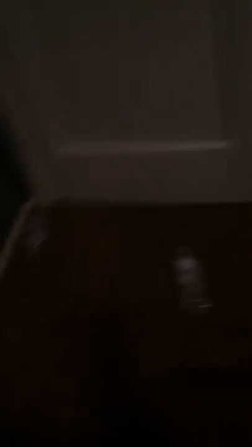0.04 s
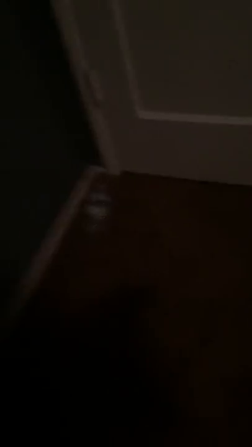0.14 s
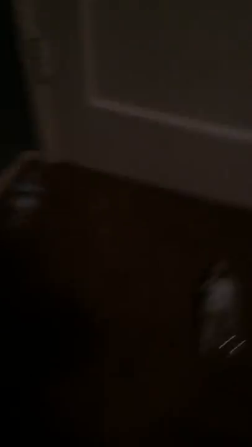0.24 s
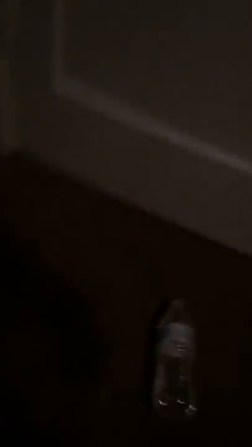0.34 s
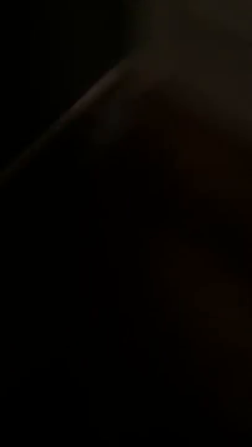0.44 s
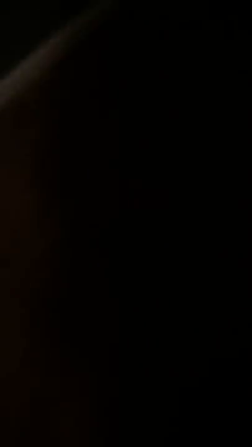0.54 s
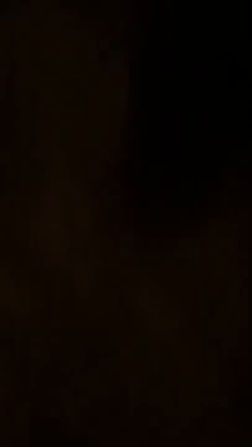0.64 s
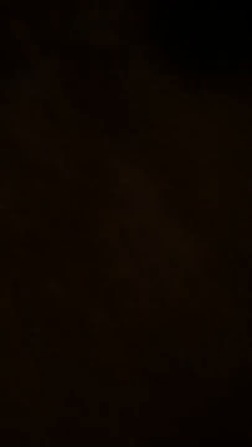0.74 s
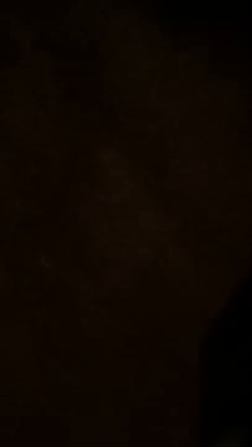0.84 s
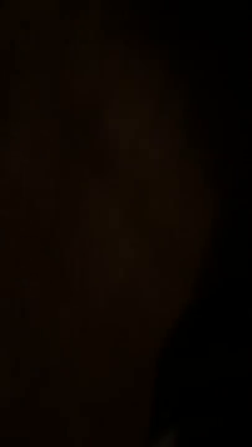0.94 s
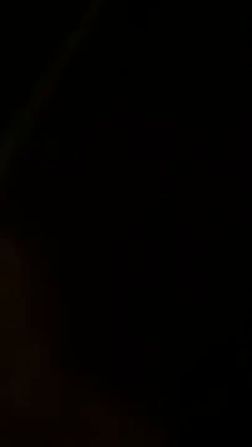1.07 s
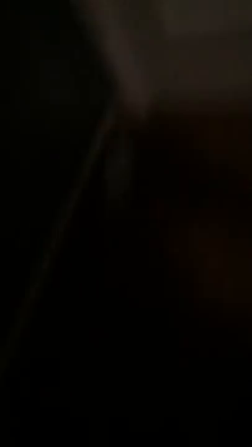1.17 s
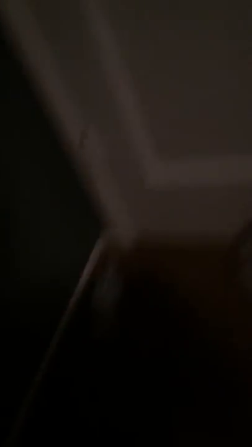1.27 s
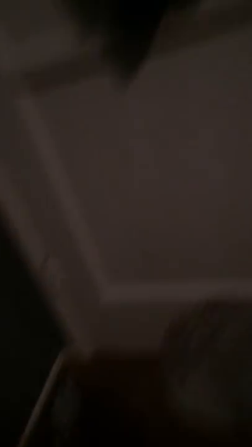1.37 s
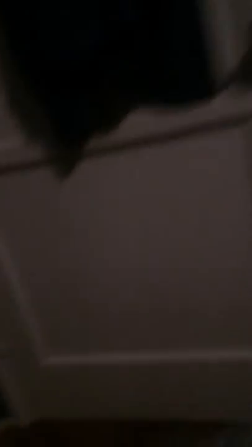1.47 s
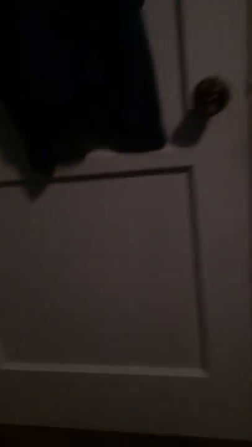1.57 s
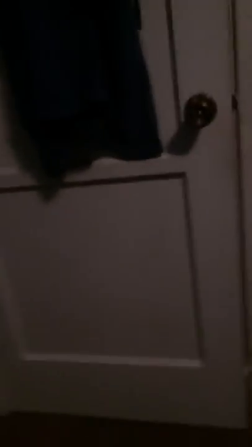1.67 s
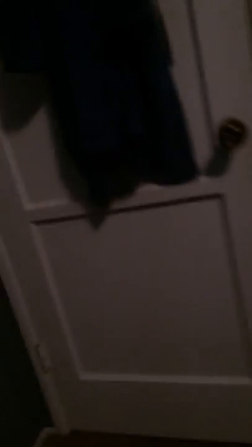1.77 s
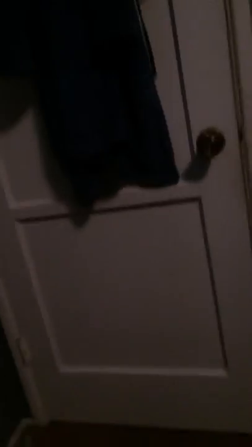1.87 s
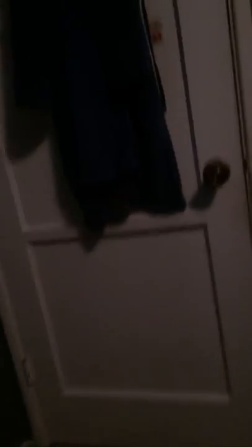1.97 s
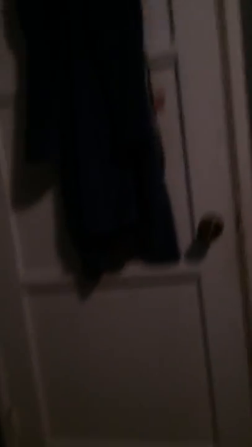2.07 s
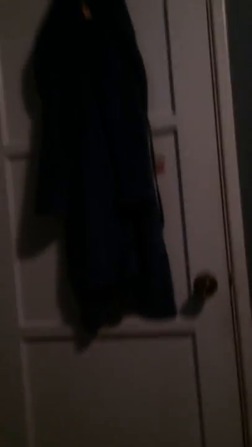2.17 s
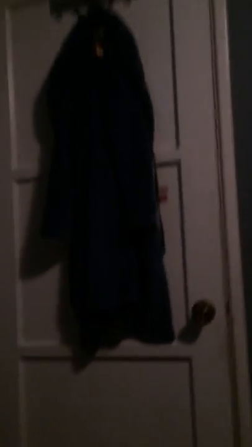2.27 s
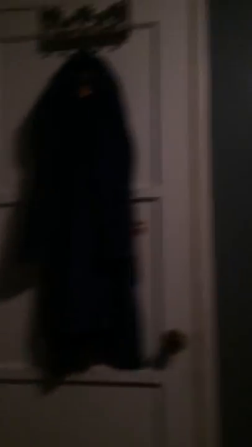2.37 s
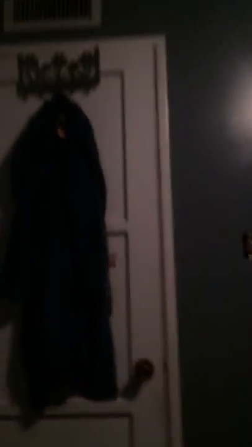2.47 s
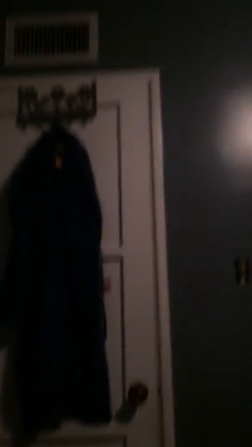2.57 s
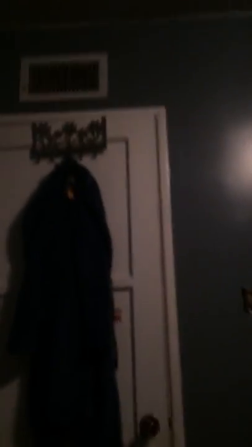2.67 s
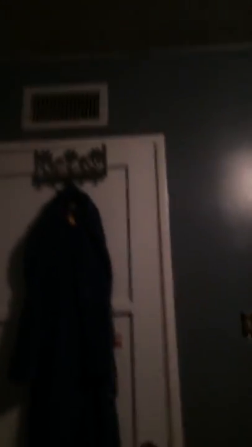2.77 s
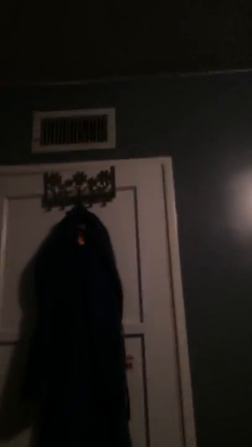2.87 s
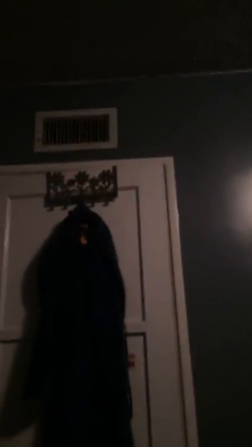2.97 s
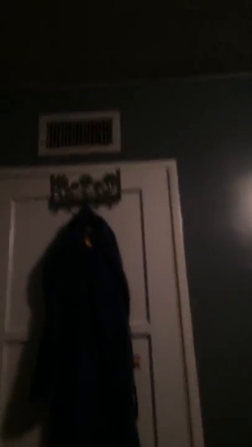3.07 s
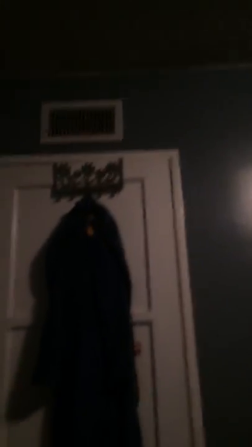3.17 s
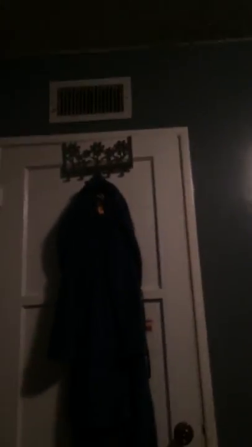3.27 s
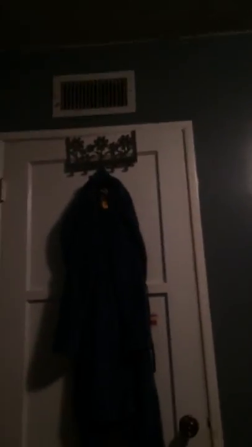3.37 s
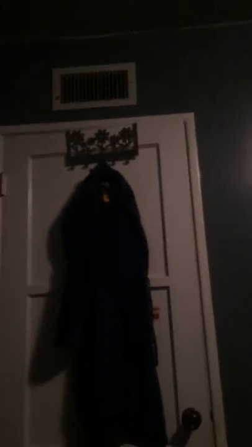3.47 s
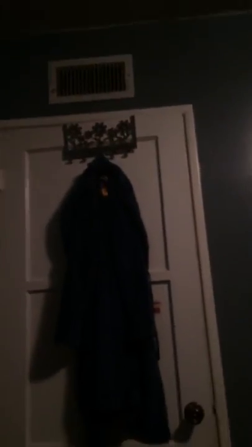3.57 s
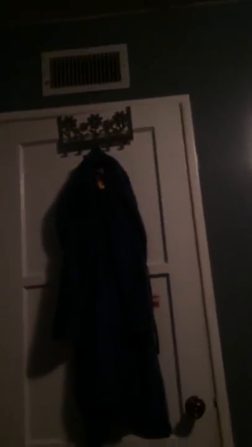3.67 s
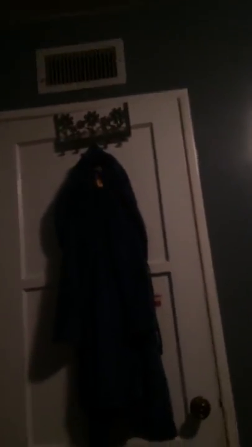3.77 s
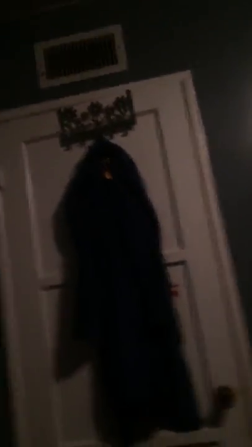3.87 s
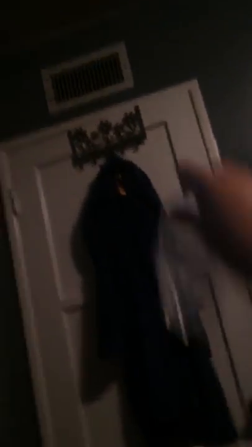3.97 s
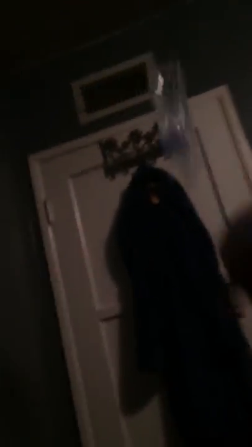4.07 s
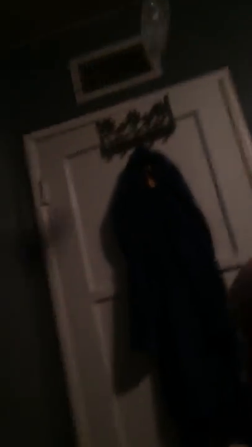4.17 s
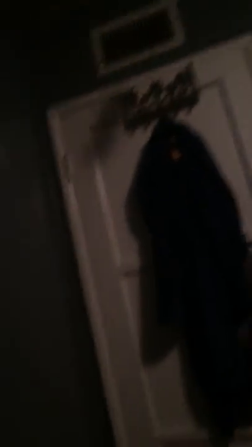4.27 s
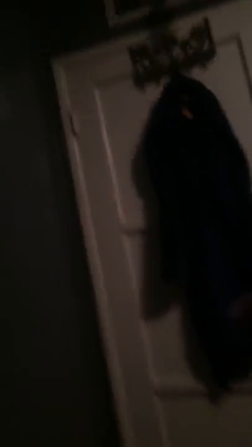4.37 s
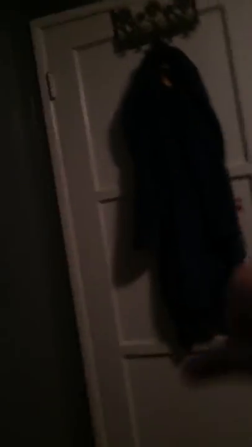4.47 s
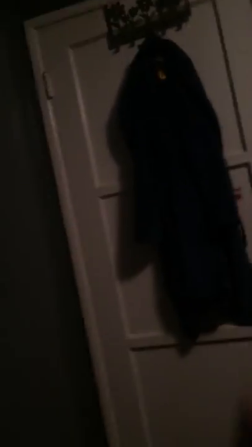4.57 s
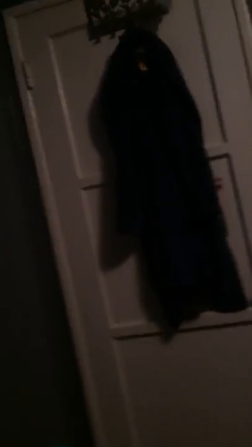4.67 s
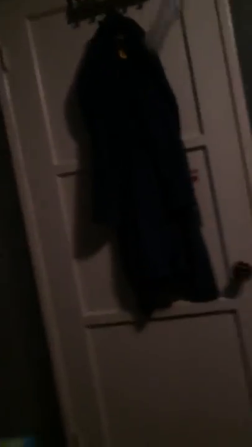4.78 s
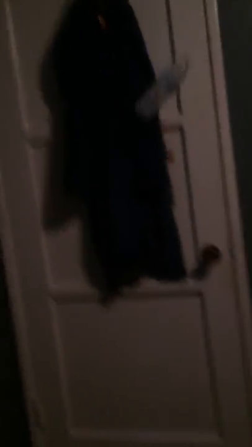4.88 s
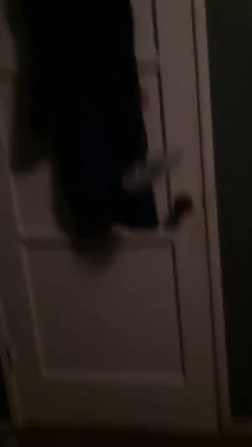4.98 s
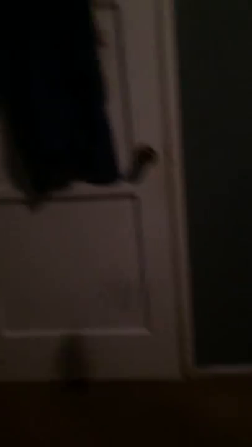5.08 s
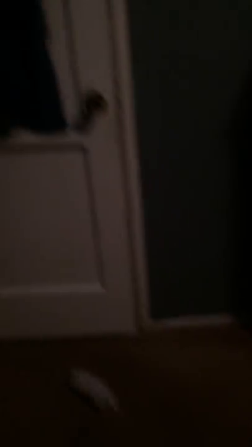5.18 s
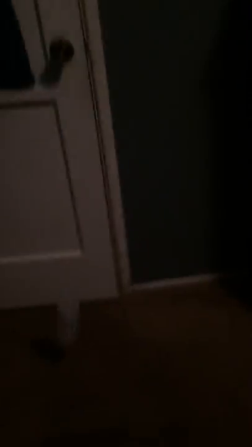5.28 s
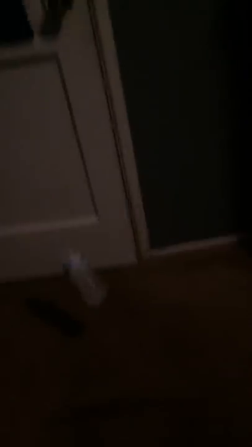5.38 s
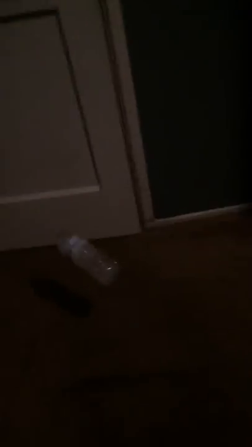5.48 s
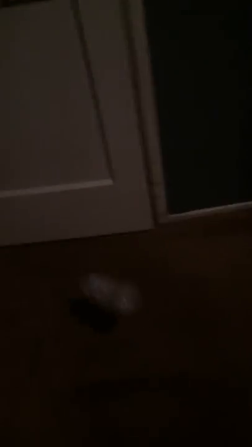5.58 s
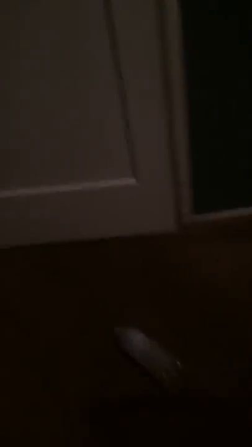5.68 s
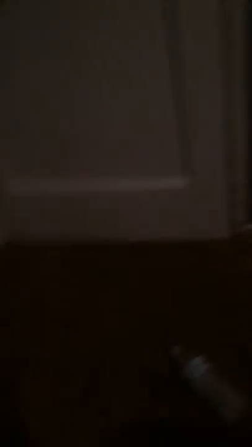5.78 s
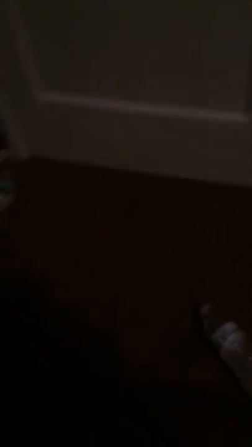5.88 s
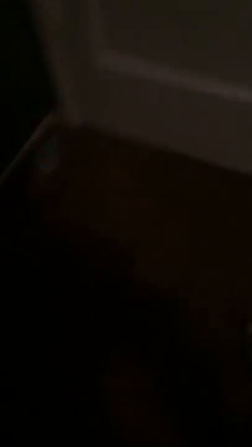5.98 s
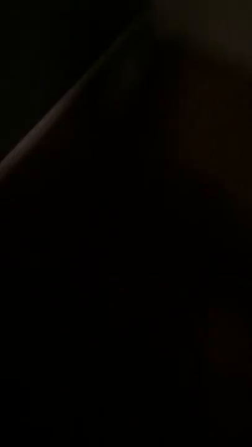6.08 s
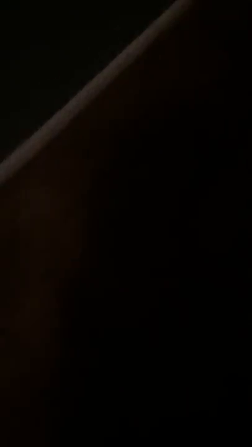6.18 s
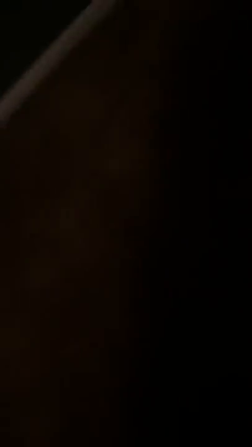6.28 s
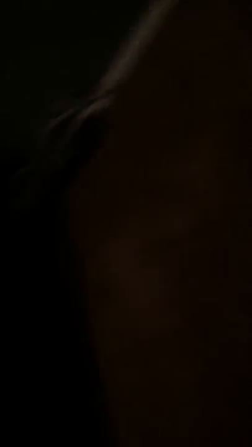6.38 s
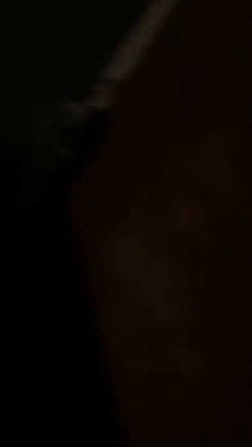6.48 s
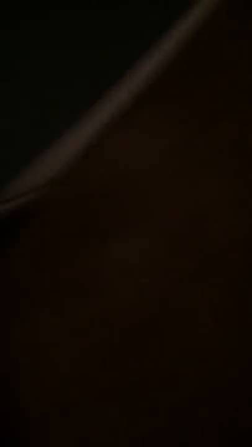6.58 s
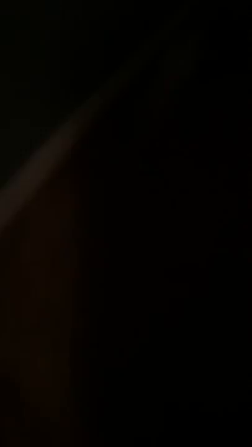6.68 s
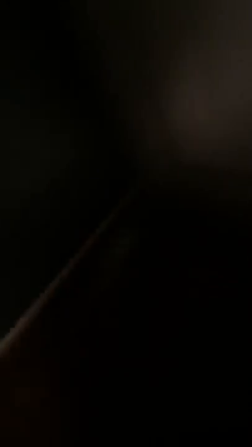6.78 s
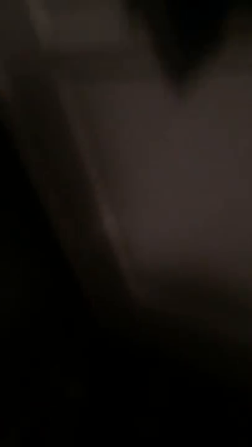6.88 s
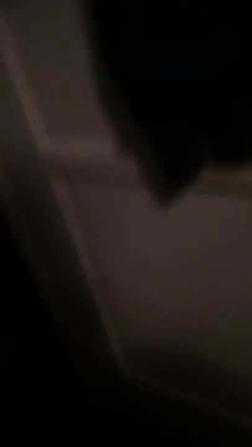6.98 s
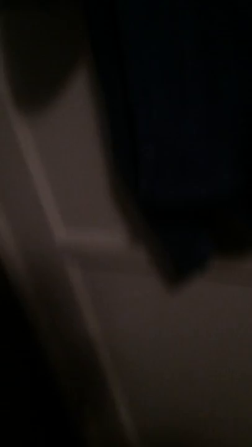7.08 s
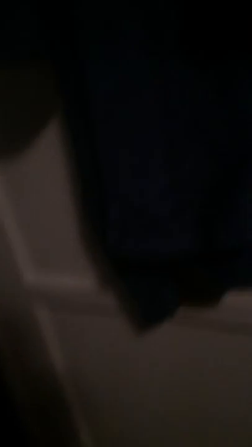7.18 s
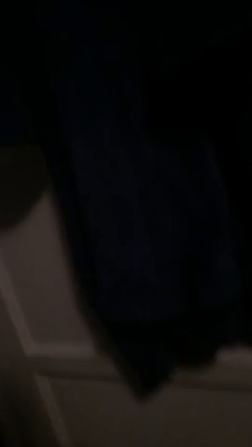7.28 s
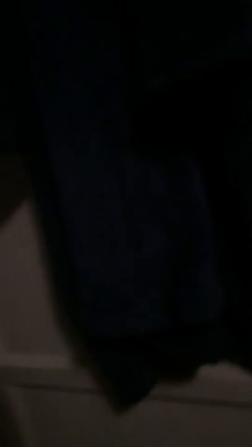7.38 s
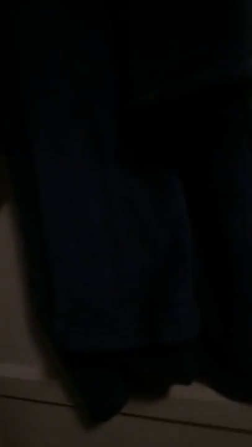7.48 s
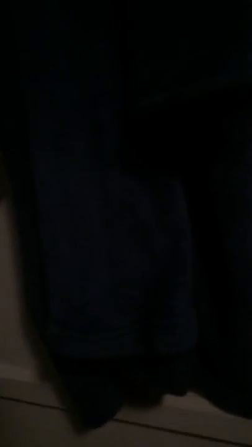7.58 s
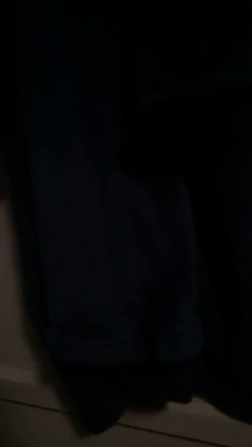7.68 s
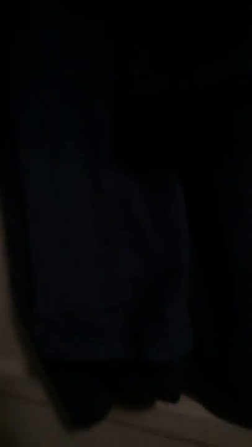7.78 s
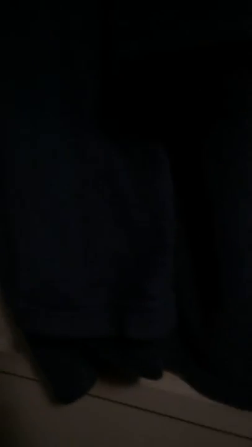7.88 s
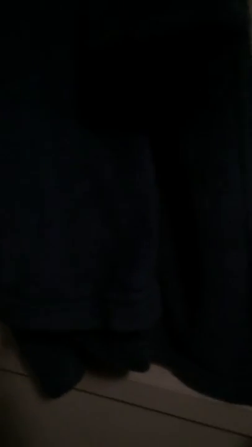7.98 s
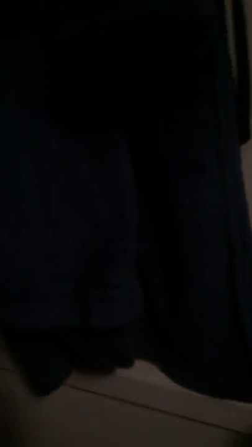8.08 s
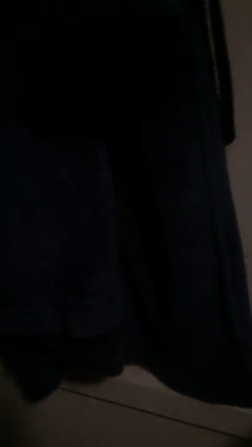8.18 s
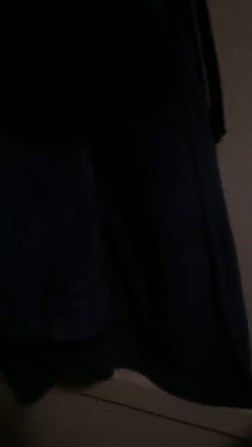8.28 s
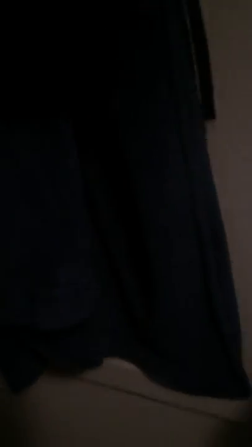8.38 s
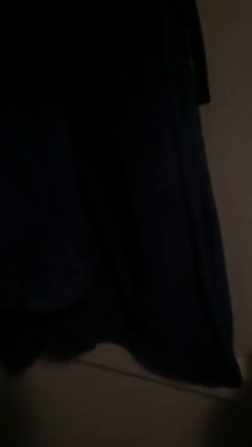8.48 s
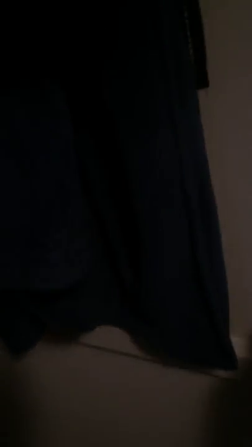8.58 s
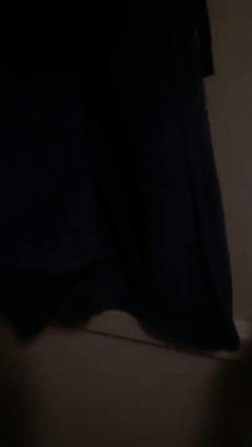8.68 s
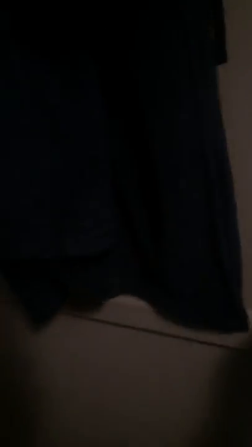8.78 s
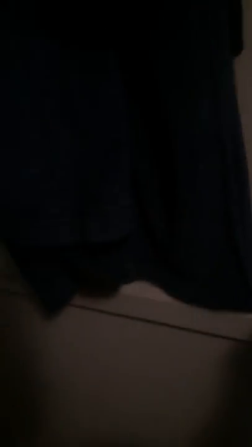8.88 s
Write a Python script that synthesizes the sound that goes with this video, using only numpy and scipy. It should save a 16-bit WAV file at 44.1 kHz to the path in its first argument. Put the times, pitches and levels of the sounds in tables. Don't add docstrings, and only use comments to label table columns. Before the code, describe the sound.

Close to a hand-held phone in a small soft bedroom, feet thump the boards and a thin plastic bottle pops and crinkles as it is picked up. After a quiet pause it is gripped and thrown, cracking hard on a wooden door; a metal rack jingles faintly, the bottle thuds on the floorboards and bounces. Footsteps follow, then loud crisp plastic snaps in the hand, fading to hush.

```python
import sys
import numpy as np
from scipy import signal
from scipy.fft import rfft, irfft, next_fast_len
from scipy.io import wavfile
from scipy.ndimage import uniform_filter1d, map_coordinates

SR = 44100
rng = np.random.default_rng(int(sys.argv[2]) if len(sys.argv) > 2 else 0)


def materialize(psi):
    bounded = np.clip(np.atleast_2d(psi).T, -1, 1)
    quanta = np.round(bounded * 32767).astype(np.int16)
    wavfile.write(sys.argv[1], SR, quanta)


def ratio(d):
    e = np.asarray(d, float) / 20
    return 10 ** e


N = 394254
LONG = 16384
T = np.arange(LONG) / SR

# start_s, level_db, direction [towards + or away -]
BLOWS = [
    (4.558, -34, 1),
    (4.570, -30, 1),
    (4.587, -29, -0.75),
    (4.596, -26, 0.57),
    (4.603, -33, 0.99),
    (4.5792, -21, 1),
]


def unit(x):
    return x / np.sqrt(np.mean(x ** 2) + 1e-20)


def along(points, hz):
    f, v = np.transpose(points)
    return np.interp(np.log(hz + 1), np.log(f + 1), v)


def curve(rows):
    s, value = np.transpose(sorted(rows))
    return np.interp(np.arange(N) / SR, s, value)


def wobble(rate):
    return map_coordinates(rng.standard_normal(int(N * rate / SR) + 4), [np.arange(N) * rate / SR])


def filtered(x, response):
    m = next_fast_len(len(x) + 2048)
    return irfft(rfft(x, m) * response(np.fft.rfftfreq(m, 1 / SR)), m)[:len(x)]


def peak(f, hz, width_hz):
    return 1j * f * width_hz / (hz * hz - f * f + 1j * f * width_hz)


def add(track, s, sound):
    track[round(s * SR):][:len(sound)] += sound


def ring(modes, attack, scatter_db=0):
    out = np.zeros(LONG)
    for hz, db, t60 in modes:
        t = T[:int(1.2 * t60 * SR)]
        decay = np.exp(-np.log(1000) * t / t60)
        add(out, 0, ratio(db + scatter_db * rng.normal()) * decay * np.sin(2 * np.pi * hz * t))
    return out * (1 - np.exp(-T / attack))


def tails(count):
    # pitch_hz, t60_s
    decay_times = [(200, 0.28), (1500, 0.19), (6000, 0.2), (14000, 0.17)]
    hz, t = np.fft.rfftfreq(256, 1 / SR), np.arange(130) * 128 / SR
    z = rng.standard_normal((count, 129, 130)) + 1j * rng.standard_normal((count, 129, 130))
    decay = ratio(-60 * t / along(decay_times, hz)[:, None])
    tail = signal.istft(z * decay, SR, nperseg=256)[1][:, :LONG]
    build_up = np.clip(T / 0.014, 0, 1)
    return rfft(tail * build_up / np.linalg.norm(tail, axis=1)[:, None], 2 * LONG)


TAILS = tails(count=40)


def room(x, walls_db, wet_db, feed=None):
    # delay_s, level_db
    surfaces = [(.0027, -8.5), (.0045, -7.5), (.0071, -13), (0.0116, -16), (0.013, -25)]
    source = x if feed is None else feed
    tail = irfft(rfft(source, 2 * LONG) * TAILS[rng.integers(len(TAILS))])[:LONG]
    out = x + ratio(wet_db) * tail
    for s, db in surfaces:
        late = round(s * SR * rng.uniform(.9, 1.1))
        out[late:] += ratio(db + walls_db) * x[:-late]
    return out


def plastic(events, spikiness, click, ping_db, walls_db, wet_db, gain_db):
    lag = .001
    out = np.zeros(N + LONG)
    for s, db, hz, dull_db, wall_db, bright_db, life, swell in events:
        brief = life < .1
        t = T[:4096 if brief else LONG]
        jolt = rng.standard_normal(len(t))
        jolt = np.sign(jolt) * np.abs(jolt) ** spikiness
        jolt *= ratio(-60 * t / np.clip(life, .002, .4)) * (1 - np.exp(-t / swell))
        jolt[0] = click * (swell < lag)

        f = np.fft.rfftfreq(len(t), 1 / SR)
        panel = peak(f, hz, hz / 1.4) ** 3 + ratio(ping_db) * peak(f, hz, hz / 9) ** 2
        treble = ratio(bright_db + 2.5) * peak(f, 11500, 11000) ** 2
        wall = panel + ratio(wall_db) * peak(f, 1800, 6000) ** 2 - treble
        belly = peak(f, 430, 1700) ** 3

        crack, body = irfft(rfft(jolt) * [wall, belly])
        sharp, dull = 1 / np.abs(crack).max(), ratio(dull_db) / np.abs(body).max()
        sound = sharp * crack + dull * body
        even_click = np.linalg.norm(jolt) * irfft(sharp * wall + dull * belly)
        padded = np.pad(sound, (0, LONG - len(t)))
        heard = room(padded, walls_db, wet_db, even_click if brief else sound)
        add(out, s + lag, ratio(db + gain_db) * heard)
    return out[:N]


def knocks(blows, modes, attack, wet_db, scatter_db):
    out = np.zeros(N + LONG)
    for s, db, direction in blows:
        add(out, s, direction * ratio(db) * room(ring(modes, attack, scatter_db), -33, wet_db))
    return out[:N]


def thumps(events, attack, gain_db, upper_db):
    out = np.zeros(N + LONG)
    for s, db, hz, t60 in events:
        add(out, s, ratio(db + gain_db) * ring([(hz, 0, t60), (1.9 * hz, upper_db, 0.67 * t60)], attack))
    return out[:N]


def thrown_bottle():
    # start_s, peak_db, ring_hz, dull_db, life_s
    crumples = [(4.5543, -27.5, 1378, -6.5, 0.049), (4.5585, -14, 1600, -7, 0.06),
                (4.569, -11, 1760, -6, 0.05), (4.573, -8.5, 11080, -32.5, 0.082),
                (4.584, -12, 1450, -2, 0.24), (5.249, -41.5, 1197, -20, 0.038),
                (5.265, -15, 4170, -8, 0.053), (5.268, -10.5, 1800, -10, 0.045),
                (5.269, -15, 10500, -30, .04), (5.278, -22, 2590, -4.5, .2), (5.737, -36.5, 2000, -5, .05),
                (5.7419, -22.5, 1375, -3.5, 0.14), (5.747, -20, 1900, -6.5, .07),
                (5.782, -21, 900, -4.5, 0.05), (5.787, -24, 1700, -9, .05),
                (5.792, -26.5, 3920, -6.5, 0.17)]
    # start_s, peak_db, ring_hz, dull_db, life_s
    neck = [
        (4.5785, -3, 1780, -4, .02),
        (5.2715, -9, 5100, -12, .02),
    ]
    events = []
    for rows, swell_s in [(crumples, .003), (neck, .0001)]:
        for s, db, hz, dull_db, life in rows:
            bright_db = -4.5 + 1.1 * db
            events.append((s, db, hz, dull_db, 2, bright_db, life, swell_s))
    return plastic(events, spikiness=1.6, click=8, ping_db=-8.0, walls_db=-0.5, wet_db=-1.5, gain_db=-3.2)


def struck_door():
    # pitch_hz, level_db, t60_s
    door_modes = [(179, -3, .12), (262, -2, 0.18), (354, 1, 0.2), (450, -14, 0.04), (323, -2, 0.13),
                  (560, -6, 0.19), (682, -7, 0.056), (717, -8, .1), (791, -16, .15), (1200, -5, .1),
                  (1427, -6, 0.13), (1674, -6, 0.11), (1820, 0, .04), (1980, -4, .04)]
    return knocks(BLOWS, door_modes, attack=.001, wet_db=-5, scatter_db=1)


def struck_floor():
    # start_s, level_db, direction
    drops = [
        (5.248, -35, 0.9),
        (5.262, 1.5, -0.17),
        (5.2685, -8.5, 0.9),
        (5.2725, -3, -0.65),
    ]
    # pitch_hz, level_db, t60_s
    drop_modes = [(81.5, -4, 0.081), (113, -10, 0.29), (150, -0.5, 0.16), (206, -20.5, .3),
                  (253, -23, 0.25), (363, -17, 0.058), (651, -25, .12), (931, -28, .1)]
    # start_s, level_db, direction
    bounces = [
        (5.7385, -15.5, 0.93),
        (5.7438, -14, -0.81),
        (5.7895, -18.5, -0.99),
    ]
    # pitch_hz, level_db, t60_s
    bounce_modes = [(70, -1.5, 0.14), (113, -1.5, 0.075), (146, 4.5, 0.053), (296, -13.5, 0.15),
                    (321.7, -11.5, 0.14), (514, -16.5, 0.067)]
    landing = knocks(drops, drop_modes, attack=0.0019, wet_db=-16, scatter_db=1.5)
    return landing + knocks(bounces, bounce_modes, attack=0.005, wet_db=-9.5, scatter_db=0)


def rack():
    # start_s, bars_db, tinkle_db, knock_db
    taps = [
        (4.803, -54, -59, -42.5),
        (4.826, -49, -55, -43.5),
        (4.8976, -37, -46, -30),
        (4.926, -51.5, -50, -47),
        (4.9754, -48.5, -54, -43),
        (5.008, -45.5, -47, -44),
        (5.075, -61, -65, -41),
        (5.1529, -54, -56.5, -47.5),
    ]
    # level_db, t60_s
    bars_hz = [2428, 2536, 2702, 4056, 5130, 5378, 5502, 5782, 6062, 6853, 7144, 8969, 9512, 10040]
    bars_ring = [(-14, .2), (-11, 0.2), (-9, .2), (-9, .45), (-10, .35), (-10, .25), (-13.5, .3), (-14, .3),
                 (-11, .3), (-6.5, .3), (-12, .3), (-9, 0.18), (-10.5, .3), (-6.5, .15)]
    # level_db, t60_s
    hooks_hz = [3155, 3951, 4048, 4457, 5130, 6062, 6363, 6724, 7192, 9200, 10700, 12050]
    hooks_ring = [(-38, 0.5), (-43, .38), (-47, 0.7), (-47, .3), (-44, .45), (-44.5, 0.53), (-40, 0.32),
                  (-40.5, .25), (-47.5, .4), (-31, 0.23), (-34.5, 0.18), (-31, 0.22)]
    # pitch_hz, level_db, t60_s
    rail = [(180, -6, .08), (240, -8, .08), (371, -9, .08), (575, -7, .1), (815, -16, .1), (1100, -20, .05),
            (1265, -19, .07), (1590, -19, .06), (2050, -21, .05)]

    hooks = [(hz, *row) for hz, row in zip(hooks_hz, hooks_ring)]
    bars = [(hz, *row) for hz, row in zip(bars_hz, bars_ring)]
    bars += [(hz, -11, .14) for hz in rng.uniform(7800, 12400, size=14)]

    def chatter():
        return ratio(1.5 * unit(uniform_filter1d(rng.standard_normal(LONG), 200)))

    def burst(level_db, t60, hz, width_hz):
        noise = filtered(rng.standard_normal(LONG), lambda f: peak(f, hz, width_hz) ** 2)
        return ratio(level_db - 60 * T / t60) * noise

    out = np.zeros(N + LONG)
    add(out, BLOWS[-1][0], room(chatter() * ring(hooks, 0.0018), -17.5, -14.5))
    for s, db, tinkle_db, knock_db in taps:
        tinkle = burst(tinkle_db + 2.5, .08, 11000, 3500)
        tick = burst(18, .07, 2700, 1500)
        shifted_rail = [(hz * rng.uniform(.96, 1.04), level, t60) for hz, level, t60 in rail]
        wood = ratio(knock_db - 1.5) * ring(shifted_rail, .004, scatter_db=3)
        metal = ratio(db - 14.5) * (chatter() * ring(bars, .001, scatter_db=3) + tick)
        add(out, s, room(metal + tinkle + wood, -1.5, -6.5))
    return out[:N]


def handled_bottle():
    # start_s, peak_db, ring_hz, dull_db
    snaps = [(0.857, -24.5, 2810, -21), (1.051, -28, 980, -4), (1.3308, -43.5, 2700, -27),
             (1.489, -42.5, 1140, 0), (2.2384, -39, 3970, -8.5), (3.9896, -37, 3220, -7),
             (4.0819, -33.5, 1310, -3), (4.0945, -30, 3303, 6), (6.4149, -6.5, 2630, -13.5),
             (6.4929, -10.5, 4800, -22), (6.6355, -10.5, 1800, -15), (7.7652, -45, 1800, -2)]
    dents = [(0.4211, -51.5, 950, 15.5), (6.4764, -21, 2380, -30.5), (0.482, -44.5, 1300, 6.5),
             (0.6717, -34, 980, 6.5), (1.0272, -28.5, 2300, -3.5), (1.2396, -46.5, 1120, -11),
             (2.7223, -47, 1060, -17), (3.6799, -47, 6000, -3), (4.338, -41, 1350, -15.5),
             (4.3992, -45.5, 1707, -22), (6.5777, -22.5, 2160, -11), (6.6646, -31, 1250, 10),
             (7.0878, -54, 1130, 19), (7.1286, -32, 1528, -21), (1.058, -35, 750, 6.5),
             (1.0905, -33, 815, 7.5)]
    creaks = [
        (1.096, -37, 1650, 2),
        (2.0597, -35.5, 3920, -22),
        (6.8079, -40.5, 1880, -22),
        (6.949, -30, 990, -1),
        (7.004, -38, 2630, -4.5),
    ]
    ticks = [(.9808, -44, 5800, -30), (1.0013, -42, 4500, -15), (1.0113, -36, 6500, -30),
             (1.0362, -25, 4670, -30), (1.0477, -24, 5800, -30), (4.076, -41, 1500, 13),
             (6.404, -46, 6000, -30), (6.702, -46, 5600, -30), (6.947, -38, 4400, -30),
             (7.0095, -28.5, 3800, -30), (4.096, -32, 7600, -30), (.6725, -43, 3500, -30),
             (6.7285, -33, 12500, -30), (7.0105, -44, 12000, -30), (6.949, -42, 11500, -30),
             (7.197, -39, 2180, -30), (7.205, -43, 4800, -30)]
    pops = [
        (0.7137, -40.5, 2260, 5),
        (4.0564, -42, 1560, 5),
        (6.7237, -12, 2500, -14.5),
    ]
    flicks = [
        (3.1775, -38, 8800, -30),
        (4.145, -29, 8600, -30),
        (6.634, -36, 9000, -30),
        (6.3404, -45, 4300, -30),
    ]
    squashes = [(.597, -42, 1500, 4), (.742, -38, 2500, -5), (4.179, -32, 1750, -8),
                (4.252, -41, 1690, -25), (4.254, -41, 5900, -30), (6.235, -42, 950, 13),
                (6.299, -30, 2300, 0), (6.9045, -38.5, 1900, -25), (6.9445, -20, 2690, -20),
                (7.021, -34, 1800, -10), (6.965, -46, 13500, -30), (6.914, -46, 3500, -30),
                (3.167, -53, 4500, -15), (6.7195, -32, 3000, -30), (4.179, -36, 6000, -30),
                (4.182, -39, 12500, -30), (.598, -46, 3200, -30), (.745, -44, 4500, -30)]
    kinds = [
        (snaps, (0, -9, 0.036, .0002)),
        (dents, (-18, -42, 0.03, .0003)),
        (creaks, (-37, -53, 0.067, .0003)),
        (ticks, (-30, -30.5, 0.017, .0003)),
        (pops, (-12, -30, 0.025, .0003)),
        (flicks, (-25, -30, .003, .0001)),
        (squashes, (-17, -40, .04, .0022))]
    events = [(*row, *kind) for rows, kind in kinds for row in rows]
    return plastic(events, spikiness=2.2, click=12, ping_db=-10, walls_db=-5.5, wet_db=-8.5, gain_db=-2.5)


def hand():
    # start_s, level_db, direction
    grabs = [
        (4.0815, -27.5, 0.98),
        (4.1, -38.5, 1),
    ]
    # pitch_hz, level_db, t60_s
    hollow = [(282, 1.5, 0.16), (341, -9, .25), (474, -7.5, 0.18), (500, -3, 0.066), (667, -6.5, 0.14),
              (876, -11, .06)]
    # start_s, level_db, direction
    bumps = [
        (7.9935, -43.5, -1.14),
    ]
    # pitch_hz, level_db, t60_s
    panel_modes = [(172, -4, 0.14), (296, -1, 0.065), (414, 6, 0.05), (567, -7.5, .08), (641, -10, 0.055),
                   (938, -3.5, 0.036), (1310, -6, .03), (1750, -12, .02)]
    grip_s, choke_db_per_s = 4.142, 700
    choke = ratio(-choke_db_per_s * np.clip(np.arange(N) / SR - grip_s, 0, 1))
    grab = choke * knocks(grabs, hollow, attack=0.0031, wet_db=-8, scatter_db=0.5)
    return grab + knocks(bumps, panel_modes, attack=0.00068, wet_db=-9.5, scatter_db=1.5)


def booms():
    # start_s, peak_db, pitch_hz, t60_s
    jolts = [(0.138, -47, 172, 0.04), (0.413, -42, 165, 0.084), (0.619, -41.5, 363, 0.05),
             (0.858, -39.5, 352, 0.057), (.858, -34, 2680, 0.019), (.885, -56, 366, 0.2),
             (1.525, -46.5, 258, 0.051), (4.007, -50.5, 270, 0.036), (4.575, -27.5, 103, 0.19),
             (6.237, -28.5, 296, 0.036), (6.296, -43, 414, 0.073), (6.43, -60, 270, 0.057),
             (6.663, -43.5, 358, 0.1), (6.926, -48, 255, 0.078), (7.764, -51, 173, 0.23),
             (7.772, -52.5, 240.7, 0.085)]
    return thumps(jolts, attack=0.0014, gain_db=7.0, upper_db=-9)


def strokes():
    # middle_s, level_db, length_s, centre_hz
    brushes = [(.148, -57, 0.061, 586), (.325, -55.5, 0.066, 1120), (.575, -57, 0.084, 840),
               (.752, -60, 0.036, 2580), (1.005, -51.5, 0.045, 2470), (1.058, -43, 0.068, 1025),
               (1.11, -43.5, 0.068, 1590), (1.195, -59.5, 0.064, 1190), (1.79, -59, 0.24, 1200),
               (2.6, -66, 0.6, 1020), (4.29, -60, 0.09, 2630), (4.693, -40.5, 0.039, 9700),
               (7.138, -44, 0.068, 2370), (7.205, -58.5, 0.093, 2030), (7.335, -50.5, 0.11, 2300),
               (7.47, -65, 0.28, 1538)]
    scrapes = [(.635, -56, 0.062, 450), (1.12, -56, .15, 161), (2.66, -60, 0.28, 189),
               (2.77, -64.5, 0.25, 1250), (4.092, -44, 0.06, 3280), (6.165, -52.5, 0.082, 1930),
               (6.356, -50.5, 0.072, 2779), (4.28, -60, .05, 6170), (4.175, -60, .07, 11000),
               (.73, -56, .04, 700), (6.535, -46.5, 0.11, 2160), (7.03, -46.5, 0.081, 1910)]
    squeaks = [(2.32, -73, 0.14, 2370), (4.21, -59, 0.05, 1920), (4.36, -63, 0.07, 1500),
               (6.04, -60, 0.2, 1700), (5.96, -62, .08, 1200), (5.92, -58, .05, 520), (6.11, -58, .06, 420),
               (.58, -56, .04, 1000), (4.083, -50, .03, 4000), (6.992, -57, 0.1, 2300),
               (7.105, -49.5, 0.05, 1120), (3.171, -61, 0.021, 2200), (6.355, -48, .06, 2700),
               (6.36, -47, .06, 4300), (6.35, -50.5, 0.044, 1800), (6.965, -57, 0.09, 4400),
               (6.555, -52, 0.0396, 2400), (7.45, -69, 0.33, 2540)]
    hums = [
        (5.023, -45, 0.25, 110),
        (6.35, -35, 0.024, 202.4),
        (6.53, -41.5, 0.078, 208),
    ]
    kinds = [
        (brushes, (1.5, -1.8)),
        (scrapes, (0.85, -11.5)),
        (squeaks, (0.14, -28.5)),
        (hums, (0.083, -54.5))]
    middle = .18
    out, slips = np.zeros(N + LONG), ratio(1.7 * wobble(120))
    for s, db, length, hz, width, bright_db in [(*row, *kind) for rows, kind in kinds for row in rows]:
        swell = np.exp(-.5 * ((T - middle) / (length / 3.5)) ** 2)
        crackle = (rng.random(LONG) < 900 / SR) * rng.exponential(size=LONG)
        grit = rng.standard_normal(LONG) * (1 + 1.6 * crackle)

        def rubbed_part(f):
            hiss = ratio(bright_db - 14.5) * peak(f, 7900, 11000) ** 2
            return peak(f, hz, 1.49 * width * hz) ** 2 + hiss

        stroke = swell * filtered(grit, rubbed_part)
        stroke *= ratio(db) * np.linalg.norm(swell) / np.linalg.norm(stroke)
        stroke = room(stroke, -37.0, -7.5)
        add(out, max(s - middle, 0), stroke[max(round((middle - s) * SR), 0):])
    return slips * out[:N]


def rubbing():
    # time_s, effort_db
    effort = [(0.0, -64.5), (0.64, -56.5), (1.49, -65.5), (1.69, -59.5), (1.9, -65.5), (3.37, -75),
              (3.97, -66), (4.18, -59), (4.53, -68), (4.76, -62), (5.24, -66), (5.42, -84), (5.72, -60),
              (6.53, -54), (6.78, -61), (7.2, -61.5), (7.6, -72), (8.94, -77)]
    # pitch_hz, level_db [per Hz]
    dull_colour = [(120, -32), (200, -1), (294, 7.5), (574, 2), (966, 1.5), (1230, -3), (3000, -47.5),
                   (3900, -50), (6600, -120)]
    # pitch_hz, level_db [per Hz]
    bright_colour = [(880, -23.5), (1500, -0.5), (2620, -5.5), (3990, -7.5), (5450, -7.5), (6890, -9),
                     (12400, -13.5), (15500, -14)]
    effort_db = curve(effort) + 65
    slips = ratio(1.4 * wobble(42) + 0.6 * wobble(170))
    crackle = (rng.random(N) < 300 / SR) * rng.exponential(size=N)
    grit = rng.standard_normal(N) * (1 + 1.2 * crackle)
    dull = unit(slips * filtered(rng.standard_normal(N), lambda f: ratio(along(dull_colour, f))))
    bright = unit(slips * filtered(grit, lambda f: ratio(along(bright_colour, f))))
    return ratio(-68.5 + 0.96 * effort_db) * dull + ratio(-69 + 0.94 * effort_db) * bright


def footfalls():
    # start_s, peak_db, board_hz, t60_s
    steps = [(0.092, -68, 56.5, 0.17), (0.329, -27, 70.0, 0.21), (0.408, -33, 70.0, 0.14),
             (0.548, -34.5, 84.6, 0.18), (0.61, -35, 71, 0.15), (0.737, -38, 77, 0.06), (1.04, -53, 58, .3),
             (1.17, -53.5, 58, 0.28), (1.529, -35.5, 71.8, 0.17), (1.556, -28.5, 63, 0.12),
             (1.633, -37, 54, 0.18), (1.718, -52, 48.3, 0.81), (1.909, -50, 76.5, 0.082),
             (1.979, -60, 53.8, 0.083), (2.626, -50, 58.5, 0.11), (4.18, -46, 119, 0.18),
             (4.428, -48, 56, 0.1), (5.92, -46.5, 64, 0.31), (6.194, -30, 69, 0.13),
             (6.229, -35, 59.2, 0.22), (6.271, -38.5, 55.2, 0.22), (6.632, -37, 66.4, 0.21),
             (7.484, -41, 58.1, 0.17), (7.767, -47, 124, 0.15), (7.999, -57, 57.4, 0.73)]
    return thumps(steps, attack=0.011, gain_db=8, upper_db=-11.0)


def loaded_boards():
    # time_s, load_db
    weight = [(0.0, -62.5), (0.53, -55), (0.74, -58.5), (1.46, -78), (1.73, -44.5), (2.06, -76),
              (4.0, -72.5), (4.53, -65), (4.7, -46.5), (5.24, -52), (5.47, -54), (5.88, -72.5), (6.15, -48),
              (6.31, -58), (7.18, -62), (8.01, -59.5), (8.19, -75), (8.94, -66.5)]
    load_db = curve(weight) + 60
    joist = filtered(rng.standard_normal(N), lambda f: peak(f, 68, 67) ** 2)
    board = filtered(rng.standard_normal(N), lambda f: peak(f, 112, 37) + 0.45 * peak(f, 190, 220) ** 2)
    joist = unit(joist * ratio(0.85 * wobble(36)))
    board = unit(board * ratio(0.83 * wobble(10)))
    return ratio(-63.5 + 1.4 * load_db) * joist + ratio(-66 + 0.56 * load_db) * board


def room_tone():
    # pitch_hz, level_db [per Hz]
    hush = [(15, -33), (25, 1.5), (119, -1.5), (156, -3), (350, -16.5), (400, -29.5), (446, -18),
            (497, -21.5), (1030, -25), (1240, -20.5), (1810, -27.5), (1960, -26), (15600, -30.5)]
    return ratio(-72) * unit(filtered(rng.standard_normal(N), lambda f: ratio(along(hush, f))))


def scene():
    bottle = thrown_bottle() + handled_bottle() + booms() + hand()
    struck = struck_door() + struck_floor() + rack()
    movement = strokes() + rubbing() + footfalls() + loaded_boards()
    return (bottle + struck + movement + room_tone())[None]


def band_limit(x):
    return signal.sosfilt(signal.butter(12, 16470, fs=SR, output="sos"), x)


def record(dry):
    mix = filtered(dry[0], lambda f: f < 15500)[None]
    return band_limit(mix)


dry = scene()
out = record(dry)
materialize(out)
```